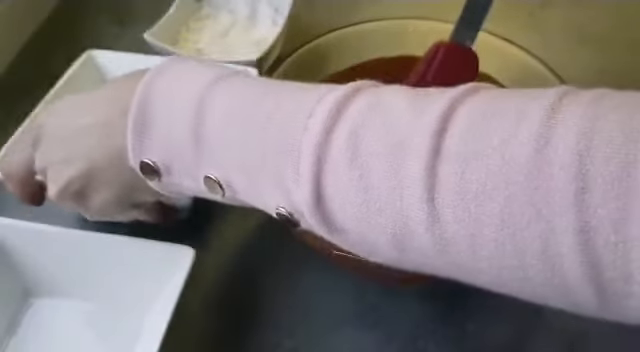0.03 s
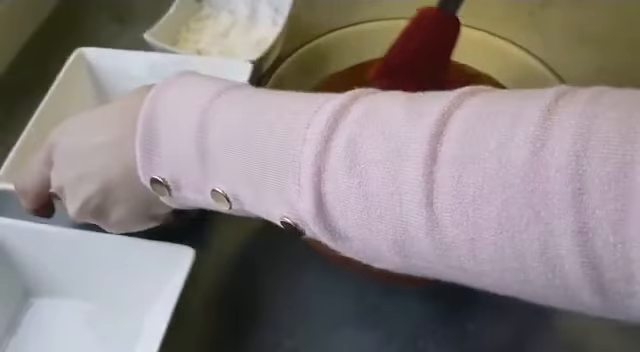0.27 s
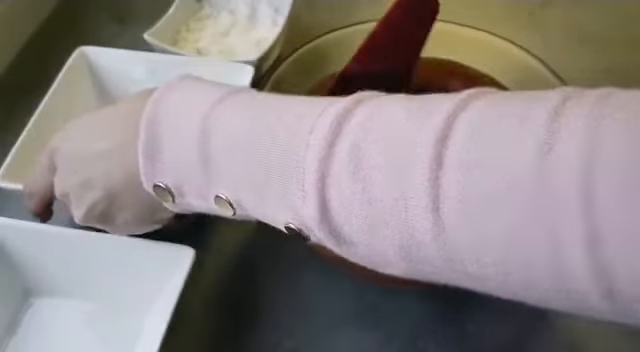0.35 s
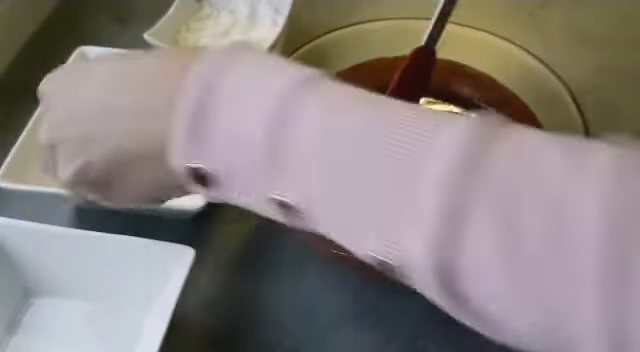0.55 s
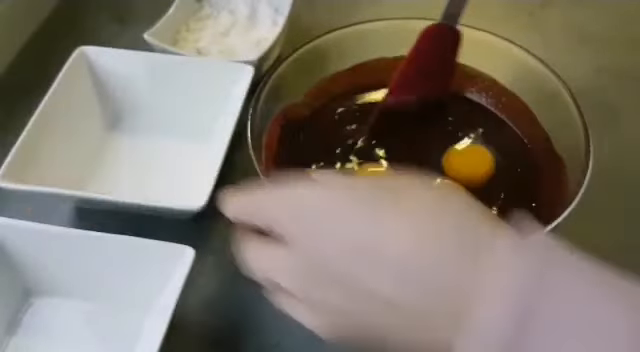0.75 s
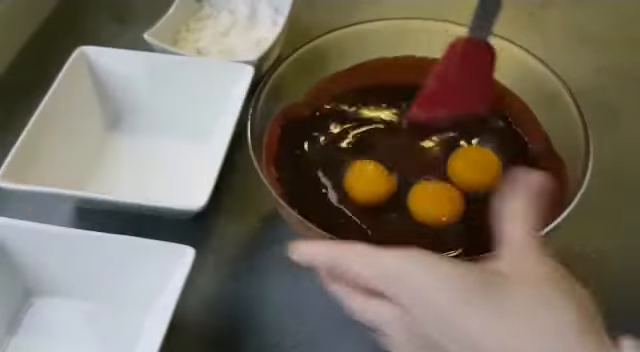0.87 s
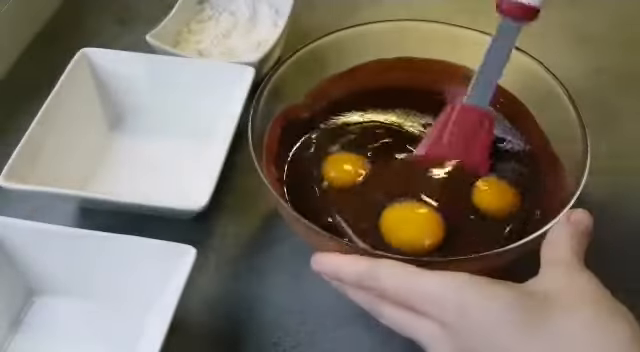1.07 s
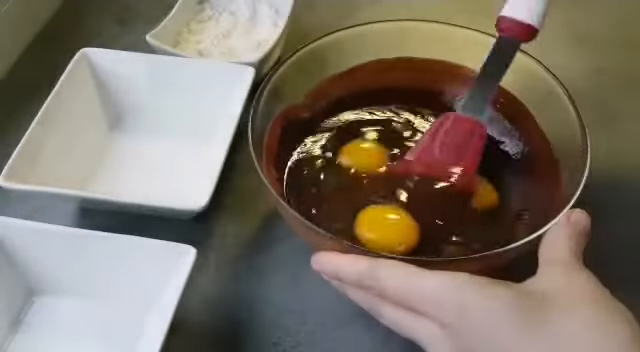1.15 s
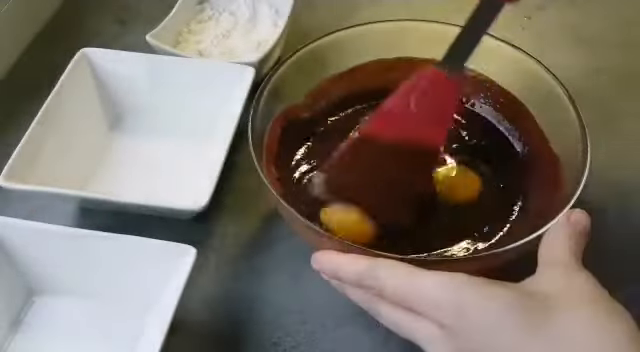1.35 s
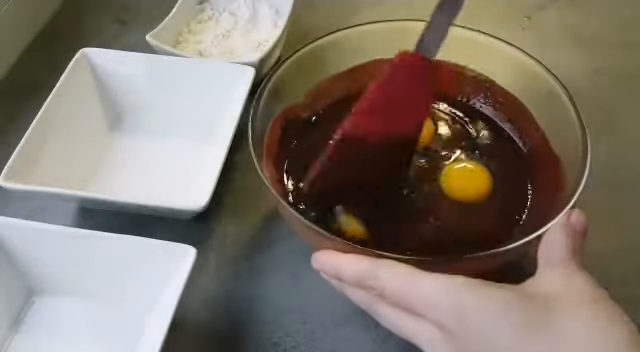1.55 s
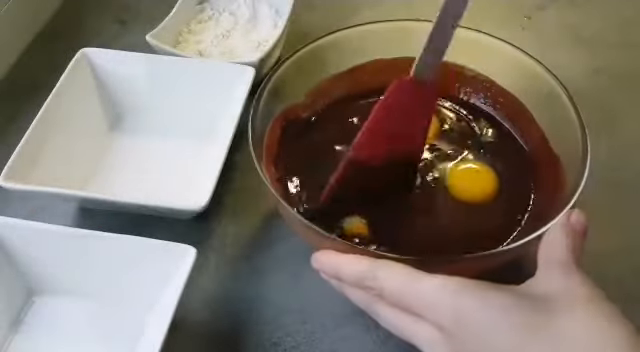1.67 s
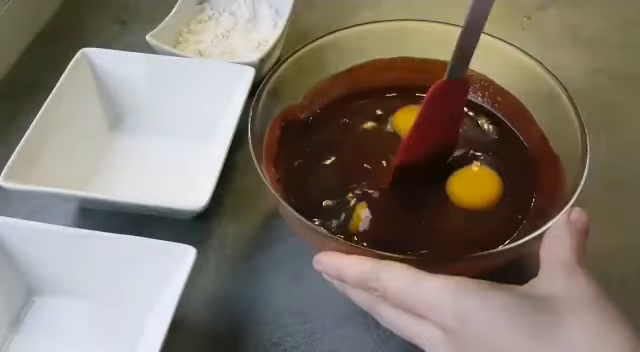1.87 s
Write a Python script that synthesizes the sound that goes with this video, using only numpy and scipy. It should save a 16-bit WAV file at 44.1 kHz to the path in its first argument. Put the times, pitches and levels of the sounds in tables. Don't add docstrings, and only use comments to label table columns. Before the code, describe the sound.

Close stereo pickup in a small hard-walled kitchen: two blunt ceramic knocks on the counter with small rattles, a brief glaze ring cut short, then much quieter damped spatula clicks on a glass bowl over soft hiss.

```python
import sys
import numpy as np
from scipy import signal
from scipy.io import wavfile

SR = 44100
rng = np.random.default_rng(int(sys.argv[2]) if len(sys.argv) > 2 else 0)


def amplitude_ratio(level_db):
    exponent = np.asarray(level_db, float) / 20
    return 10 ** exponent


def waveform_to_disk(signal):
    frames = np.transpose(np.atleast_2d(signal))
    scaled = np.clip(frames, -1, 1) * 32767
    samples = np.round(scaled).astype(np.int16)
    wavfile.write(sys.argv[1], SR, samples)


N = 83790
LEFT_RIGHT = np.array([[1], [-1]])

# start_s, level_db, contact_cutoff_hz, bass_share_db, left_right_db
LANDINGS = [(.1522, -15.5, 1677, 4, 1.5), (0.1541, -19, 908, 2, 0.5), (.1585, -21, 1300, -5, -7.5),
            (0.2233, -34, 1060, 10, -6.5), (.292, -55, 800, -0.5, -1.5), (0.336, -44.5, 500, 6.5, 1),
            (.3720, -24.5, 1300, 3.5, 6.5), (0.4367, -14, 1600, -9.5, 1), (.4430, -15.5, 1400, -7, -2.5),
            (.458, -26.5, 1020, 1.5, -3.5), (.503, -35, 586, 10, -5), (.553, -32.5, 1400, -2, -1.5),
            (.572, -34.5, 1400, -2.5, -4.5), (1.8955, -34.5, 600, 7, -4.5)]
# pitch_hz, level_db, t60_s
COUNTER_MODES = [(125, 2, 0.073), (155.7, 1.5, 0.15), (185, 1, 0.065), (251, 3, 0.037), (324, -4.5, 0.15),
                 (405.5, -3.5, .04), (519.5, -3.5, 0.04), (650, -4, 0.053), (800, 6, 0.034),
                 (986, 7, 0.043), (1105, 1, 0.047), (1253, 10, 0.016), (1500, -2.5, 0.037),
                 (1910, -2.5, 0.016)]
# pitch_hz, level_db, t60_s
FIRST_GLAZE_MODES = [(3005, 34.5, .015), (4754, 11, 0.028), (5663, -14.5, 0.14), (6342, 5, 0.18),
                     (7650, -1.5, .2), (8592, -14.5, 0.089), (10020, -4.5, .15), (10800, 0, 0.092),
                     (11060, -15, 0.059), (12420, -3.5, 0.11), (13140, -0.5, .08)]
# pitch_hz, level_db, t60_s
SECOND_GLAZE_MODES = [(2993, 8, .8), (3105, -14.5, 1.5), (6282, -10, .15), (7700, -13.5, .15),
                      (7900, -16, .12)]
# start_s, level_db, lower_ring_hz, upper_ring_hz, low_knock_db
SPATULA_TICKS = [(.8782, -37.5, 1715, 2650, -49), (0.8808, -43.5, 1790, 4250, -44),
                 (0.8797, -44.5, 2690, 2980, -58.5), (1.0394, -39, 1830, 3150, -59),
                 (1.0403, -43.5, 2600, 4240, -57.5), (1.042, -41.5, 1193, 4770, -56),
                 (1.1115, -58, 1300, 3270, -67), (1.1349, -57.5, 1400, 3180, -69.5),
                 (1.152, -65.5, 1500, 3170, -80), (1.8143, -44.5, 4260, 10350, -56.5),
                 (1.8161, -39, 1433, 4220, -55.5), (1.818, -54, 7400, 11500, -67.5),
                 (1.833, -54.5, 1287, 2520, -47.5)]
# pitch_hz, level_db, t60_s
BOWL_MODES = [(112.2, -5, 0.16), (138.9, 11, 0.093), (224.4, 4.5, 0.087), (309, 2, 0.19),
              (369.6, 0.5, 0.083), (458, -8.5, 0.055), (615, -7, 0.056), (875, 0.5, 0.022)]
# pitch_hz, t60_s
ECHO_DECAY = [(100, .5), (300, 0.54), (1000, 0.2752), (2000, 0.4666), (4000, 0.56), (8000, 0.8)]
# pitch_hz, level_db
ECHO_COLOUR = [(60, -7.5), (110, -4), (170, -8.5), (270, -9.5), (480, 0.5), (1000, -0.5), (2000, 2),
               (8000, -13.5)]
# pitch_hz, left_right_db
ECHO_PAN = [(250, .5), (600, 2.5), (1200, 4), (3000, 0), (9000, 4)]
# pitch_hz, correlation (-1 to 1)
PORT_LIKENESS = [(25, .2), (60, 0.91), (200, 0.91), (330, 0.65), (600, .55), (1200, -0.0094), (3000, 0.12),
                 (10000, -0.12)]
# pitch_hz, level_db (per Hz)
ROOM_TONE = [(25, -13.5), (55, -10), (100, -5.5), (300, -10), (480, -13), (620, -18.5), (2500, -25.5),
             (9000, -37.5)]
# start_s, level_db
HISS_LEVEL = [(0, -84), (.15, -84), (.17, -100), (.33, -89), (.43, -91), (.455, -104), (.56, -93),
              (.72, -85), (1.43, -85), (1.46, -100), (1.63, -97), (1.67, -86), (1.9, -84)]
# start_s, level_db
STIR_LEVEL = [
    (0, -6.5),
    (.7, 1.5),
    (0.998, 0.5),
    (1.301, -2.5),
    (1.599, -2),
    (1.9, 1.5),
]


def at_hz(points, hz):
    table_hz, values = np.transpose(points)
    return np.interp(np.log(hz), np.log(table_hz), values)


def rms_one(x):
    return x / np.sqrt(np.mean(x ** 2) + 1e-20)


def butter(x, order, hz, kind="low"):
    return signal.sosfilt(signal.butter(order, hz, kind, fs=SR, output="sos"), x)


def clicks(start_s, level_db):
    out = np.zeros(N)
    np.add.at(out, (np.atleast_1d(start_s) * SR).astype(int), amplitude_ratio(level_db))
    return out


def ring(x, hz, t60_s):
    radius = amplitude_ratio(-60 / (t60_s * SR))
    angle = 2 * np.pi * hz / SR
    return signal.lfilter([0, np.sin(angle)], [1, -2 * radius * np.cos(angle), radius ** 2], x + 1e-18)


def soften(x, hz):
    r = np.exp(-2 * np.pi * hz / SR)
    return signal.lfilter([(1 - r) ** 2], [1, -2 * r, r * r], x)


def crack(start_s, level_db, t60_s):
    envelope = signal.lfilter([1], [1, -amplitude_ratio(-60 / (t60_s * SR))], clicks(start_s, level_db))
    return envelope * rng.standard_normal((2, N))


def dish():
    clack_db, clack_hz, clack_t60_s = 10.5, 970, 0.0071
    bass_under_hz, counter_db, spread_db = 450, -4, 2.5
    lag_s, port_turn_rad = 0.0006, 1.5
    out = np.zeros((2, N))
    spread = rng.standard_normal((30, len(COUNTER_MODES), 3))
    for (start_s, level_db, cut_hz, bass_db, pan_db), own in zip(LANDINGS, spread):
        clack = soften(clicks(start_s, level_db + clack_db + 12 * np.log2(cut_hz / 1500)), cut_hz)
        out += ring(clack, clack_hz, clack_t60_s) * amplitude_ratio(pan_db * LEFT_RIGHT)
        first = int(start_s * SR)
        length = min(N - first, SR // 4)
        for k, ((hz, mode_db, t60_s), (strength, lag, turn)) in enumerate(zip(COUNTER_MODES, own)):
            low = hz < bass_under_hz
            for port, side in enumerate((1, -1)):
                port_lag_s = 0 if low else max(0, side * port_turn_rad * turn / (2 * np.pi * hz))
                hit = clicks(lag_s * abs(lag) + port_lag_s, level_db + counter_db)[:length]
                push = soften(soften(hit, cut_hz), 2 * cut_hz)
                own_db = mode_db + spread_db * strength + (bass_db if low else side * pan_db)
                out[port, first:first + length] += (-1) ** k * ring(push, hz, t60_s) * amplitude_ratio(own_db)
    start_s, level_db, cut_hz = np.transpose(LANDINGS)[:3]
    cracks = crack(start_s, level_db - 3 + 18 * np.log2(cut_hz / 1500), t60_s=0.029)
    return out + soften(cracks, 1520) * amplitude_ratio(1.5 * LEFT_RIGHT)


def glaze():
    damp_from_s, damp_db_per_s, pan_db = 0.56, 288, 2.5
    out = np.zeros(N)
    for modes, start_s, level_db in (FIRST_GLAZE_MODES, 0.153, -54.5), (SECOND_GLAZE_MODES, 0.452, -45.5):
        for hz, mode_db, t60_s in modes:
            onset = ring(clicks(start_s, level_db + mode_db), hz, 4.2 / hz)
            out += ring(onset, hz, t60_s) * hz / SR
    damped_db = -damp_db_per_s * np.maximum(np.arange(N) / SR - damp_from_s, 0)
    return out * amplitude_ratio(damped_db + pan_db * LEFT_RIGHT)


def spatula():
    upper_db, ring_cycles, rubber_db, pan_db = -6.5, 21.2, -22, 2.5
    start_s, level_db = np.transpose(SPATULA_TICKS)[:2]
    rubber = crack(start_s, level_db - 6, t60_s=0.063)
    out = amplitude_ratio(rubber_db) * rubber + butter(rubber, 4, [990, 4860], "band")
    for at_s, tick_db, low_hz, high_hz, _ in SPATULA_TICKS:
        for hz, ring_db in (low_hz, tick_db), (high_hz, tick_db + upper_db):
            onset = ring(clicks(at_s, ring_db + 17.5), hz, 3.03 / hz)
            out += ring(onset, hz, ring_cycles / hz) * hz / SR
    return out * amplitude_ratio(pan_db * LEFT_RIGHT)


def bowl():
    rise_s, spread_db = 0.0087, 2.37
    start_s, knock_db = np.transpose(SPATULA_TICKS)[[0, 4]]
    spread = rng.standard_normal((len(BOWL_MODES), len(start_s)))
    out = np.zeros(N)
    for (hz, mode_db, t60_s), own in zip(BOWL_MODES, spread):
        push = clicks(start_s + rise_s * np.abs(own), knock_db + mode_db + spread_db * own)
        out += ring(soften(push, 2 * hz), hz, t60_s)
    return out


def bands(size):
    settle = 4000
    edges = 25 * 2 ** np.arange(0, 9.6, 0.5)
    white = rng.standard_normal((2, 2, size + settle))
    for k, (low, high) in enumerate(zip(edges, edges[1:])):
        mid, side = butter(white[k % 2], 2, [low, high], "band")[:, settle:]
        hz = np.sqrt(low * high)
        alike = np.clip(at_hz(PORT_LIKENESS, hz), -1, 1)
        yield hz, np.sqrt(1 + alike) * mid + np.sqrt(1 - alike) * side * LEFT_RIGHT


def kitchen():
    rise_s = 0.0014
    t = np.arange(SR) / SR
    echo = np.zeros((2, SR))
    for hz, noise in bands(SR):
        level_db = at_hz(ECHO_COLOUR, hz) + at_hz(ECHO_PAN, hz) * LEFT_RIGHT
        echo += amplitude_ratio(level_db - 60 * t / at_hz(ECHO_DECAY, hz)) * noise
    return echo * (1 - np.exp(-t / rise_s)) / np.sqrt(0.086 * SR)


def room_tone():
    tone_db, hiss_db, hiss_follows = -66, -79.5, 0.47
    treble_over_hz, stir_under_hz = 5500, 550
    t = np.arange(N) / SR
    treble_db = np.interp(t, *np.transpose(HISS_LEVEL))
    dip_db = treble_db - treble_db.max()
    stir_db = np.interp(t, *np.transpose(STIR_LEVEL))
    tone = np.zeros((2, N))
    for hz, noise in bands(N):
        moving_db = (hz > treble_over_hz) * dip_db + (hz < stir_under_hz) * stir_db
        tone += amplitude_ratio(at_hz(ROOM_TONE, hz) + moving_db) * noise
    hiss = rms_one(butter(rng.standard_normal((2, N)), 3, [10000, 15400], "band"))
    hiss_gain = amplitude_ratio(hiss_db + hiss_follows * dip_db + 1.5 * LEFT_RIGHT)
    return amplitude_ratio(tone_db) * rms_one(tone) + hiss_gain * hiss


def scene():
    thumps, ticks, knocks = dish(), spatula(), bowl()
    dull_thumps = butter(thumps, 6, 6740)
    send = amplitude_ratio(2.5) * dull_thumps + amplitude_ratio(-8) * ticks + amplitude_ratio(3) * knocks
    echo = signal.fftconvolve(send[:1], kitchen(), axes=1)[:, :N]
    near = thumps + ticks + knocks + glaze() + echo
    return butter(near, 3, 120, "high") + room_tone()


def low_pass(x):
    return signal.sosfilt(signal.butter(12, 15220, fs=SR, output="sos"), x)


def record(dry):
    stop_hz, fade_s = 15600, 0.001
    mix = signal.sosfilt(signal.cheby2(10, 60, stop_hz, fs=SR, output="sos"), dry)
    mix = mix * np.clip(np.arange(N)[::-1] / (fade_s * SR), 0, 1)
    return low_pass(mix)


dry = scene()
out = record(dry)
waveform_to_disk(out)
```